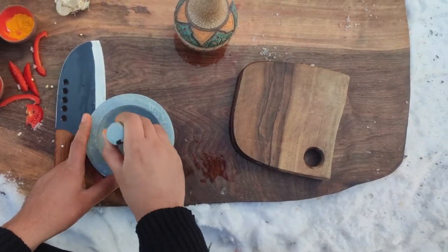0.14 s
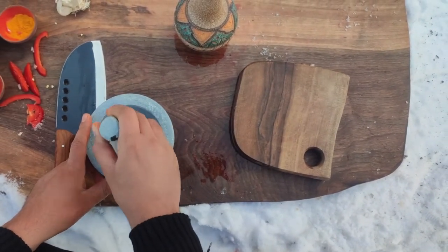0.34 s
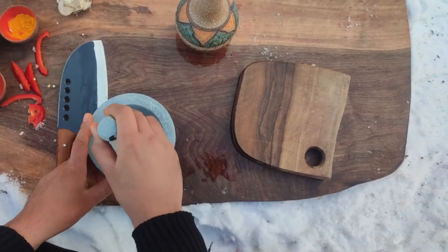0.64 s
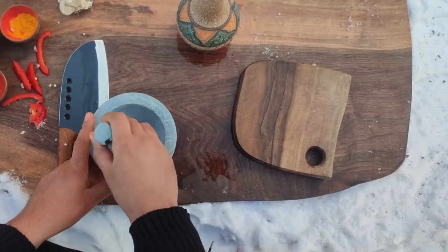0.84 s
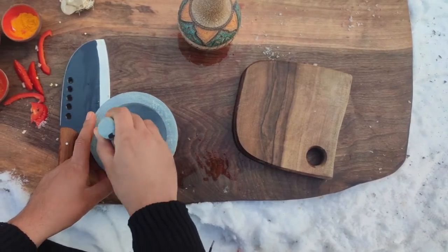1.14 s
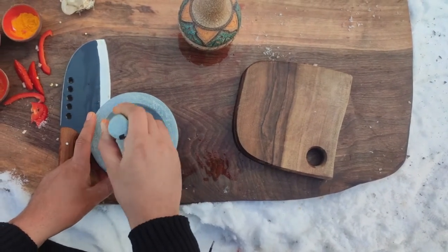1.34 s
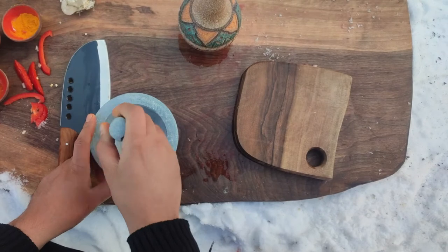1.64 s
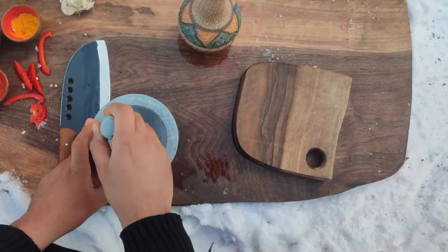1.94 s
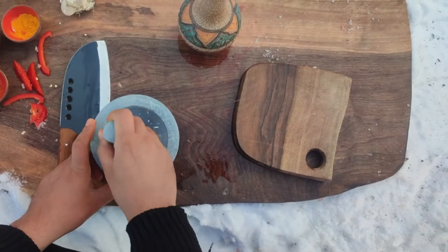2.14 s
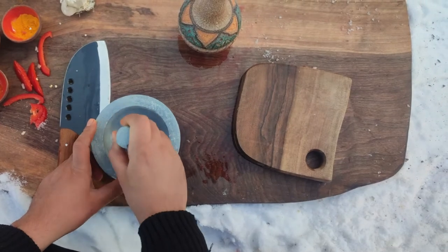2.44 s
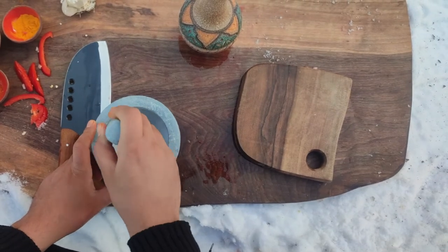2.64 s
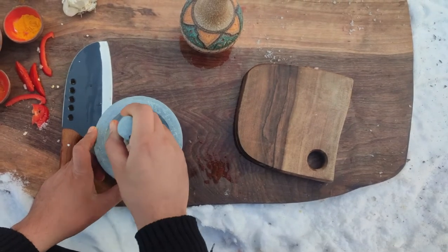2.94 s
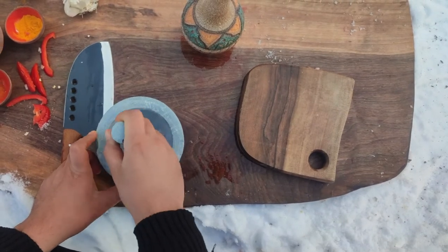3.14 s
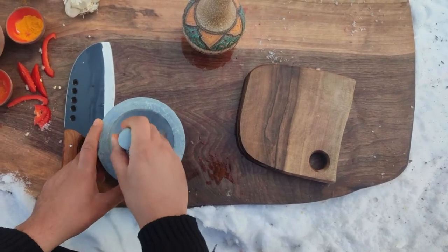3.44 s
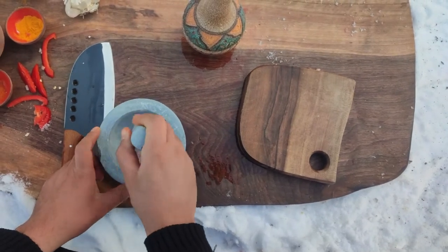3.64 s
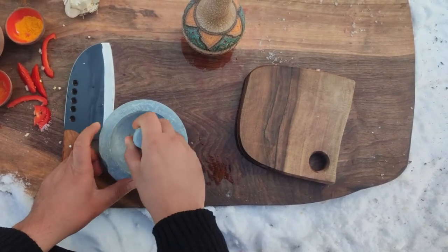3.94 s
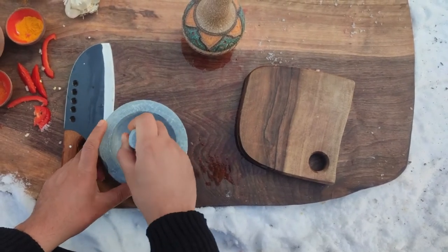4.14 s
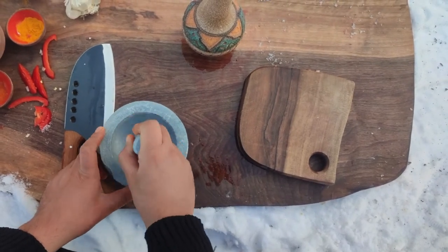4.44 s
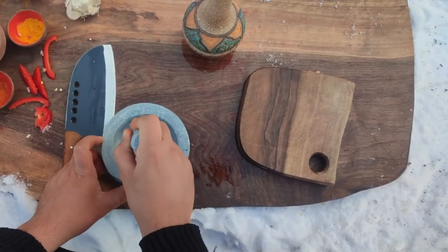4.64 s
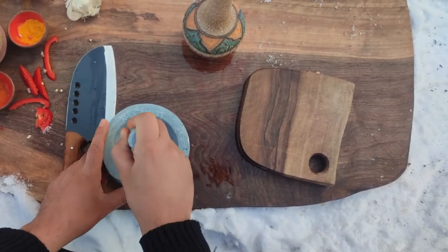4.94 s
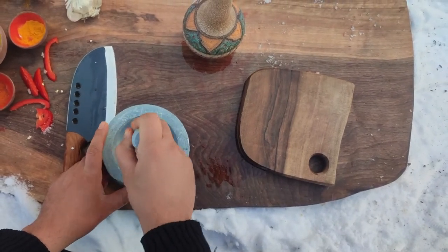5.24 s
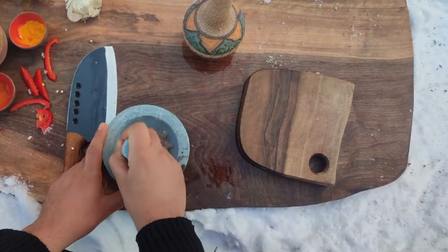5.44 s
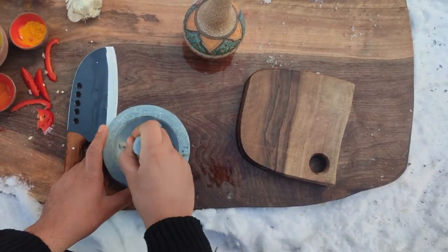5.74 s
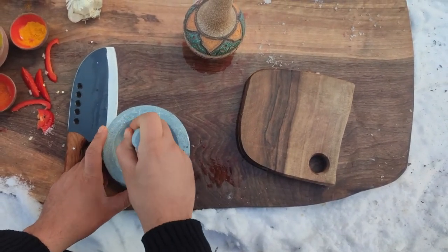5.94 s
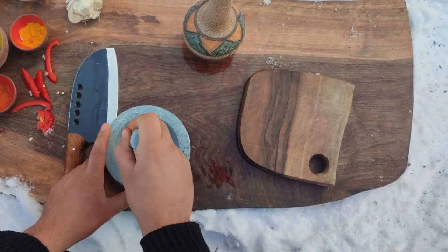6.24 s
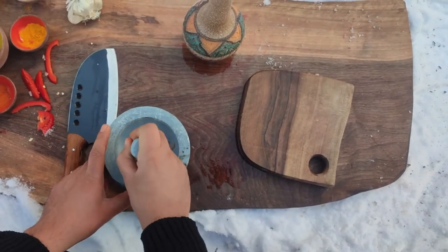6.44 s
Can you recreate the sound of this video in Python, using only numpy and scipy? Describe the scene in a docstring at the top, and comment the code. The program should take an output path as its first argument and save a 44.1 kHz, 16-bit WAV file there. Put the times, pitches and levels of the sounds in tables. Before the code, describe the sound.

From the start, a stone pestle pounds coarse salt in a stone mortar on a wooden board, close to the microphone and outdoors. The blows come evenly, about three a second. Each is a short, hard stone knock with a brief ring from the rim, a dull thump from the board and a crisp crunch of salt. The pestle often bounces with a smaller clink, and the mortar rocks briefly. Loose grains make tiny bright ticks between blows. Twelve firm strokes run until about 3.7 seconds, then one beat is skipped. At about 4.4 seconds the pounding resumes at the same pace with seven softer strokes, one mostly a dull thump near 6 seconds and the last at about 6.4 seconds. A soft open-air hiss and the faint low hum of a distant motor continue underneath throughout.

```python
"""Outdoors, close to a stone mortar on a wooden board, on a phone's two microphones.
A stone pestle pounds coarse salt: each blow crushes grains, thumps the board and rings the mortar,
which then rocks. The pestle often bounces, and loose grains tick between blows.
Behind it lie a soft open-air hiss and a far motor; the phone's limiter ducks them after loud blows."""
import sys
import numpy as np
from scipy import signal
from scipy.fft import rfft, irfft, next_fast_len
from scipy.io import wavfile
from scipy.ndimage import uniform_filter1d, minimum_filter1d

SR = 44100
rng = np.random.default_rng(int(sys.argv[2]) if len(sys.argv) > 2 else 0)


def transcribe(u):
    """Save the signal u as a 16-bit wav file named by the first command-line argument.

    u: samples, shape (n,) or (channels, n), limited to [-1, 1]; the rate is SR.
    q: integer samples, one column per channel.
    """
    v = np.clip(np.atleast_2d(u).T, -1, 1)
    q = np.round(v * 32767).astype(np.int16)
    wavfile.write(sys.argv[1], SR, q)


N = 290619
T = np.arange(N) / SR

# Modes of the board, the mortar's body and its rim: (frequency [Hz], relative level [dB], t60 [s])
BOARD_MODES = [(100, -5.5, 0.024), (126.7, -6, 0.042), (170.4, -8, 0.06), (240.2, -4.5, 0.034)]
MORTAR_MODES = [(355, 2, 0.028), (505, -5.5, 0.022), (722, -6, 0.032), (821, -9, 0.051),
                (861, -11.5, 0.025), (1160, -33, 0.022), (1266, -3.5, 0.052)]
RIM_MODES = [(1768, 1, 0.044), (1953, 1.5, 0.042), (2244, 12.5, 0.02), (2590, -1.5, 0.049),
             (2820, -0.5, 0.023), (3203, 0.5, 0.05), (3465, -8, 0.094)]
# Tone of cracking salt: (frequency [Hz], gain [dB])
SALT_SPECTRUM = [(2000, -9), (3400, -2.5), (4200, 1.5), (5300, 7), (6800, 1), (8000, -0.5), (9800, -16),
                 (11200, -10), (13000, -3.5), (15000, -46)]


def undb(db):
    return 10 ** (np.asarray(db) / 20)


def peak(x, db):
    """Scale to a peak level."""
    return x * undb(db) / np.abs(x).max()


def colour(x, points):
    """Equalise by (frequency [Hz], gain [dB]) points joined on a log axis."""
    size = next_fast_len(N)
    hz, db = np.transpose(points)
    bin_hz = np.arange(size // 2 + 1) * SR / size + 1
    gain = undb(np.interp(np.log(bin_hz), np.log(hz), db))
    return irfft(rfft(x, size) * gain, size)[..., :N]


def walk(rate):
    """Random levels held 1 / rate s and smoothed twice; spread near 1."""
    hold = int(SR / rate)
    steps = np.repeat(rng.standard_normal(N // hold + 1), hold)
    return 1.27 * uniform_filter1d(uniform_filter1d(steps, hold), hold)[:N]


def add(track, s, piece):
    """Mix a piece in at time s."""
    start = int(s * SR)
    track[..., start:start + piece.shape[-1]] += piece[..., :N - start]


def open_air(rms_db=-46):
    """Open-air rustle and hiss all round, in octave bands that flicker a little."""
    spectrum = [(15, -55), (25, 7.5), (96, -6), (265, -15.5), (338, -8), (519, -16), (697, -12),
                (797, -14.5), (2090, -17), (4440, -23.5), (5500, -17.5), (8230, -30), (9660, -38),
                (13700, -26), (15200, -88)]  # tone of the hiss: (frequency [Hz], relative density [dB])
    width = [(60, 0.84), (130, 0.96), (290, 0.89), (640, 0.46), (1400, -0.62), (3070, 0.22), (6740, -0.16),
             (14800, 0.24)]  # stereo image: (frequency [Hz], left-right correlation [-1..1])
    swell = [(0, 1), (2.7, 0), (4.4, 0), (6.1, 1.7), (6.59, 0)]  # slow rise and fall: (time [s], relative level [dB])
    size = next_fast_len(N)
    bin_hz = np.arange(size // 2 + 1) * SR / size + 1
    hz, correlation = np.transpose(width)
    alike = np.interp(np.log(bin_hz), np.log(hz), correlation)
    mid, side = rfft(colour(rng.standard_normal((2, N)), spectrum), size)
    mid, side = mid * np.sqrt(1 + alike), side * np.sqrt(1 - alike)
    stereo = np.array([mid + side, mid - side])
    swell_db = np.interp(T, *np.transpose(swell))
    out = np.zeros((2, N))
    for centre_hz in 30 * 2. ** np.arange(10):
        band = np.cos(np.pi / 2 * np.clip(np.log2(bin_hz / centre_hz), -1, 1)) ** 2
        out += irfft(stereo * band, size)[:, :N] * undb(swell_db + 1.3 * walk(14))
    return out / np.sqrt(np.mean(out ** 2)) * undb(rms_db)


def far_motor(cycle_hz=21.3):
    """A few low harmonics of a slow engine cycle, wavering with distance."""
    # Course of the hum: (time [s], 3rd harmonic level [dB], base level of the higher ones [dB])
    levels = [(0, -79, -60.5), (1.8, -55, -66.5), (2.8, -73, -62), (3.7, -71, -58), (3.9, -95, -51),
              (4.6, -70, -56.5), (5.3, -76, -54), (6.59, -71, -55)]
    s, third_db, upper_db = np.transpose(levels)
    phase = 2 * np.pi * np.cumsum(cycle_hz * (1 + .008 * walk(3))) / SR
    out = undb(np.interp(T, s, third_db) + 1.1 * walk(7.5)) * np.sin(3 * phase)
    for harmonic, db in ((4, 1.5), (5, -1.5), (8, -15), (10, -18)):
        out += undb(np.interp(T, s, upper_db) + db + 1.5 * walk(13)) * np.sin(harmonic * phase)
    return out * np.sqrt(2)


def push(ms, skew):
    """Rate of change of the contact force, which builds while grains give way and lets go quickly."""
    samples = ms * SR / 1000
    progress = np.arange(int(samples) + 1) / samples
    return -np.diff(np.sin(np.pi * progress ** skew) ** 2)


def crush(decay_ms):
    """Grains breaking: spiky noise that starts sharply and trails away, different at each microphone."""
    ms = np.arange(2000) / SR * 1000
    spikes = rng.standard_normal((2, len(ms))) * np.exp(.72 * rng.standard_normal(len(ms)))
    envelope = np.exp(-(ms / decay_ms) ** 1.02) * np.minimum(ms / .13, 1)
    burst = spikes * envelope
    return 1.6 * burst * np.sqrt(np.sum(envelope ** 2) / np.sum(burst ** 2, axis=1, keepdims=True))


def soften(force, ms):
    """A contact that lasts ms passes no faster detail."""
    window = np.hanning(int(ms * SR / 1000) + 3)
    return signal.lfilter(window / window.sum(), [1], force)


def ring(force, modes, lag_ms=.2):
    """Damped modes, varied by where the blow lands; the right microphone hears them lag_ms later."""
    hz, db, t60 = np.transpose(modes)[:, :, None]
    detune, landing_spot = rng.standard_normal((2, len(modes), 1))
    t = np.arange(int(.12 * SR)) / SR - np.array([0, lag_ms / 1000])[:, None, None]
    hz = hz * (1 + .025 * detune)
    speed = np.cos(2 * np.pi * hz * t) * 1000. ** (-t / t60) * (t >= 0)
    # the air follows the surface's acceleration
    pressure = np.diff(speed, prepend=0) * SR / (2 * np.pi * hz) * undb(db + 2 * landing_spot)
    return signal.fftconvolve(force * np.ones((2, 1)), pressure.sum(axis=1), axes=1)


def blows(regrip_s=4.0):
    """The pestle lands, close up: the mortar knocks and rocks, the board thumps, salt cracks."""
    # Pestle strokes: (time [s], mortar gain [dB], board gain [dB], salt gain [dB])
    strokes = [(0.14, -1.5, -7.5, -13.5), (0.45, -4.5, -18.5, -17), (0.762, -3.5, -10, -19),
               (1.082, -4, -3, -18), (1.422, -2.5, -5.5, -20.5), (1.764, -4, -5, -23.5),
               (2.084, -9, -10.5, -28), (2.418, -2, -4.5, -19), (2.746, -3, -8, -18.5),
               (3.068, -3.5, -9.5, -15), (3.379, -1.5, -4.5, -23), (3.701, -2, -6.5, -20.5),
               (4.412, -11.5, -7.5, -22.5), (4.749, -10.5, -10.5, -29.5), (5.07, -7, -7.5, -23),
               (5.4, -11, -10, -26.5), (5.73, -7.5, -7.5, -25), (6.048, -22, -6, -23),
               (6.384, -7.5, -7.5, -25)]
    out, salt = np.zeros((2, 2, N))
    for s, knock_db, thump_db, salt_db in strokes:
        loose = s > regrip_s  # after the pause the mortar is held more loosely and rocks longer
        contact_ms = 3.58 if loose else 3.587
        add(out, s, undb(knock_db) * ring(push(contact_ms, skew=2.48), MORTAR_MODES))
        add(out, s, undb(thump_db) * ring(push(1.16 * contact_ms, skew=1.317), BOARD_MODES))
        # the rim is struck all round, so its ring differs left and right
        clink = ring(soften(crush(decay_ms=1.86), ms=.5), RIM_MODES, lag_ms=0)
        add(out, s + .001362, peak(clink, knock_db - 12.5))
        add(salt, s + .00025, undb(salt_db) * crush(decay_ms=2.53))
        add(out, s, rocking(drive_db=-34.5, t60=.26) if loose else rocking(drive_db=-34, t60=.19))
    return out + colour(salt, SALT_SPECTRUM)


def rocking(drive_db, t60):
    """Rocking base and sliding salt: a dense, uneven, dying patter shakes mortar, board and rim."""
    t = np.arange(int(.2 * SR)) / SR
    lumps = np.repeat(rng.standard_normal(len(t) // 130 + 1), 130)[:len(t)]  # about 3 ms each
    envelope = np.exp(.42 * lumps) * 1000. ** (-t / t60) * np.minimum(t / .00043, 1)
    patter = undb(drive_db) * rng.standard_normal((2, len(t))) * envelope
    mortar = undb(-12) * ring(soften(patter[0], ms=.99), MORTAR_MODES)
    board = undb(-9) * ring(soften(patter[0], ms=3.37), BOARD_MODES)
    rim = undb(-33) * ring(soften(patter, ms=.13), RIM_MODES, lag_ms=0)
    return mortar + board + rim


def loose_grains(band_hz=6660, decay_s=.0019):
    """Single grains snap or drop, each a short, bright tick."""
    ticks = [(0.2906, -41), (1.0087, -32), (1.0157, -38), (1.0204, -37), (1.3897, -35), (1.718, -37),
             (1.8287, -34), (1.902, -42), (1.9214, -44), (2.0009, -42), (2.3346, -40), (3.1577, -44),
             (3.287, -45), (4.4802, -41), (5.6411, -42), (5.893, -31.5)]  # one grain each: (time [s], gain [dB])
    out, t = np.zeros((2, N)), np.arange(200) / SR
    band = signal.butter(1, [.6 * band_hz, 1.6 * band_hz], "bandpass", fs=SR)
    for s, db in ticks:
        snap = rng.standard_normal((2, len(t))) * np.exp(-t / decay_s)
        add(out, s, undb(db) * signal.lfilter(*band, snap))
    return out


def grazes():
    """The pestle catches a heap of salt just before it lands: a light knock and a crack."""
    catches = [(0.4471, -19.5, -31), (1.7564, -15, -32.5), (3.371, -15.5, -18.5)]  # early contacts: (time [s], knock peak [dB], salt gain [dB])
    out, salt = np.zeros((2, 2, N))
    for s, knock_db, salt_db in catches:
        add(out, s, peak(ring(push(ms=3.5, skew=1.64), MORTAR_MODES + BOARD_MODES), knock_db))
        add(salt, s, undb(salt_db) * crush(decay_ms=1.87))
    return out + colour(salt, SALT_SPECTRUM)


def bounces(decay_ms=4.24):
    """The pestle touches down again, roughly, through salt: a knock, a rim clink and a faint crunch."""
    touches = [(0.474, -19.5, -53), (0.784, -15, -45), (0.814, -28, -33), (1.105, -17, -21.5),
               (1.447, -14, -14.5), (1.773, -4, -18.5), (1.786, -38, -17.5), (1.862, -35.5, -37.5),
               (2.448, -19.5, -21.5), (2.469, -20, -25), (2.775, -21, -26), (3.098, -18, -27),
               (3.13, -28, -29.5), (3.405, -16.5, -20), (3.729, -18, -20), (3.75, -44, -31.5),
               (4.44, -26, -47), (4.469, -24, -28.5), (4.784, -19, -23), (4.807, -24, -40),
               (4.855, -39, -40.5), (5.104, -24, -18.5), (5.129, -17.5, -45), (5.149, -25, -29),
               (5.433, -18.5, -32), (5.461, -17, -20), (5.491, -30.5, -30), (5.765, -19, -18.5),
               (5.788, -24, -23.5), (6.08, -15, -31), (6.101, -20, -19), (6.409, -38, -50),
               (6.44, -18.5, -17.5)]  # rebounds: (time [s], knock peak [dB], clink peak [dB])
    out, salt = np.zeros((2, 2, N))
    for s, knock_db, clink_db in touches:
        scuff = crush(decay_ms)
        add(out, s, peak(ring(soften(scuff[0], ms=1.32), MORTAR_MODES + BOARD_MODES), knock_db))
        add(out, s, peak(ring(soften(scuff, ms=.15), RIM_MODES, lag_ms=0), clink_db))
        add(salt, s, undb(clink_db - 23.5) * crush(decay_ms))
    return out + colour(salt, SALT_SPECTRUM)


def scene():
    """Pestle and salt in front, air and motor far behind."""
    return blows() + bounces() + grazes() + loose_grains() + open_air() + far_motor()


def limiter(x, ceiling=.96, ahead_s=.003, hold_s=.072, release_s=.03):
    """Turns both channels down just ahead of a peak, holds, then lets go."""
    ahead, hold, release = int(ahead_s * SR), int(hold_s * SR), int(release_s * SR)
    needed_gain = np.minimum(ceiling / (np.abs(x).max(axis=0) + 1e-9), 1)
    held = minimum_filter1d(needed_gain, hold + ahead, origin=(hold - ahead) // 2 - 1)
    released = signal.lfilter(np.ones(release) / release, [1], held - 1) + 1
    return x * uniform_filter1d(np.minimum(held, released), ahead)


def record(dry):
    """The phone: two unequal microphone ports, a bass cut, a limiter and a steep treble cut."""
    imbalance = [(60, -1.5), (400, -0.5), (1300, -3.5), (3300, -2.5), (4600, -4), (6200, -9.5), (8000, 15),
                 (10500, -0.5), (14000, -2)]  # tone of the ports: (frequency [Hz], left minus right [dB])
    bass_cut_hz, treble_cut_hz = 58.4, 15400
    left = colour(dry[0], [(hz, db / 2) for hz, db in imbalance])
    right = colour(dry[1], [(hz, -db / 2) for hz, db in imbalance])
    x = signal.lfilter(*signal.butter(2, bass_cut_hz, "highpass", fs=SR), [left, right])
    treble_cut = signal.ellip(8, .2, 70, treble_cut_hz, fs=SR, output="sos")
    return signal.sosfilt(treble_cut, limiter(x))


dry = scene()
out = record(dry)
transcribe(out)
```